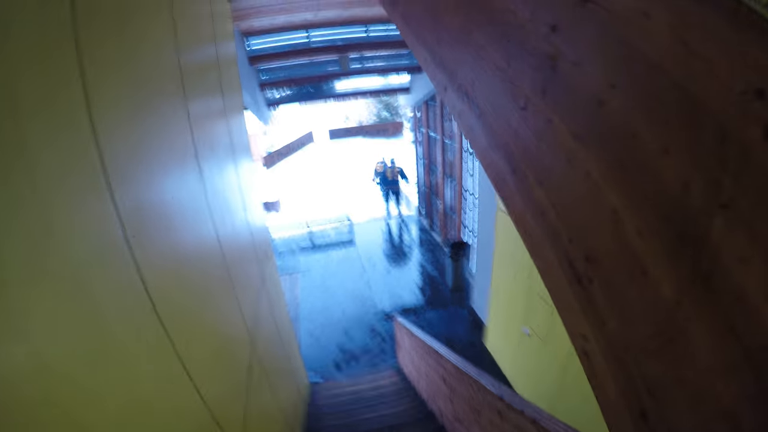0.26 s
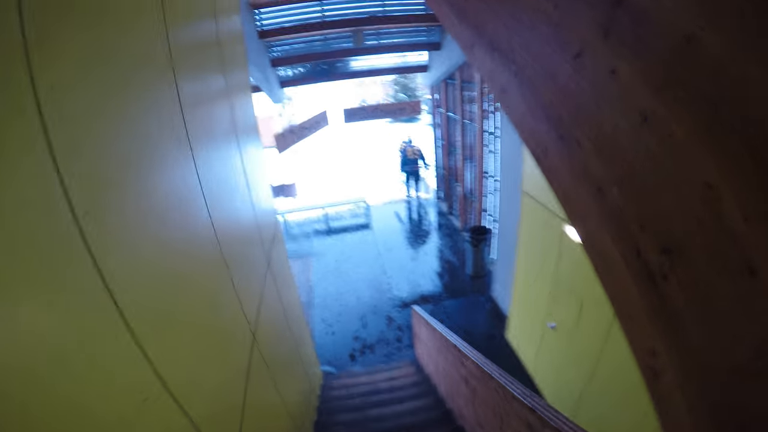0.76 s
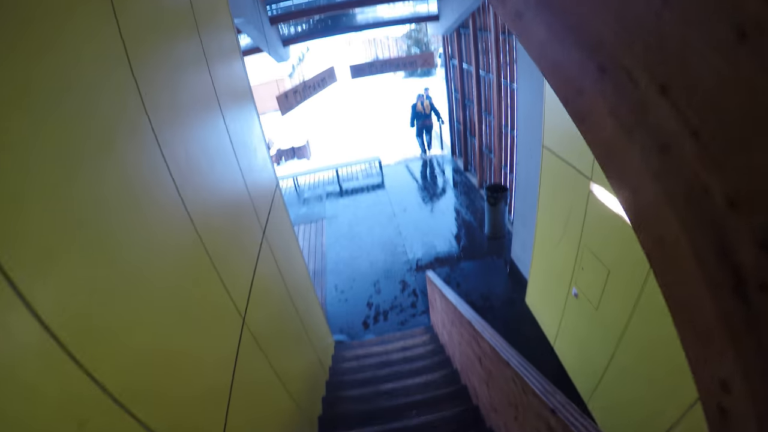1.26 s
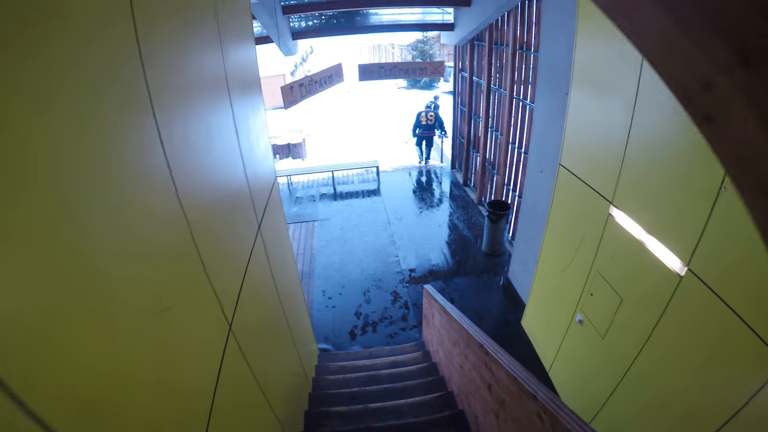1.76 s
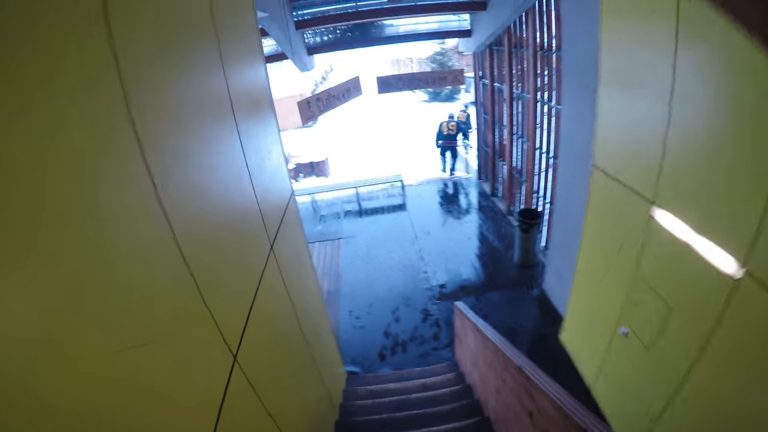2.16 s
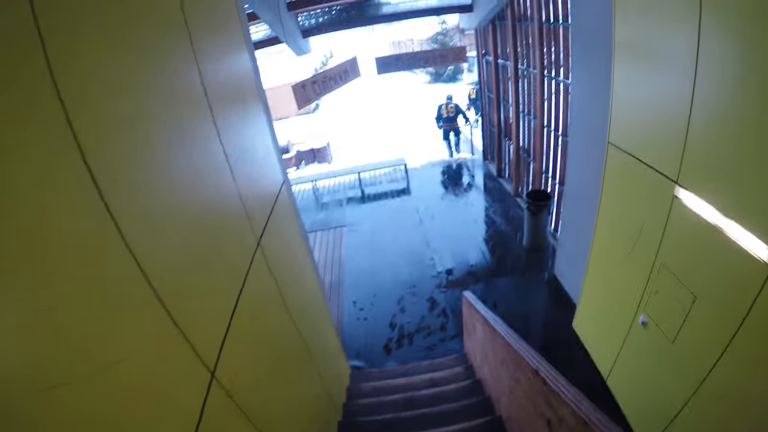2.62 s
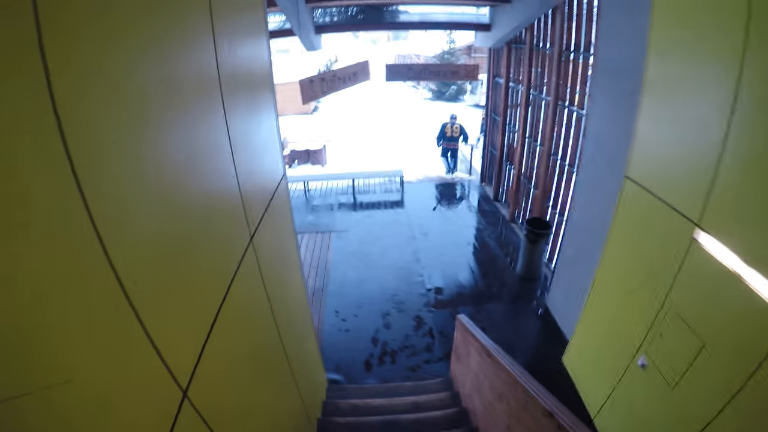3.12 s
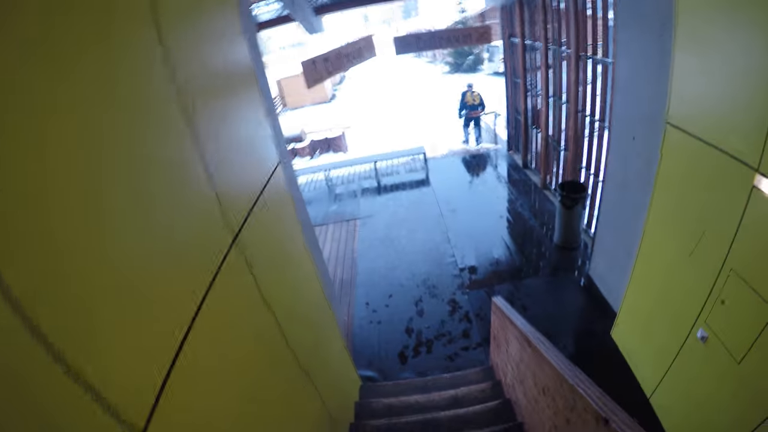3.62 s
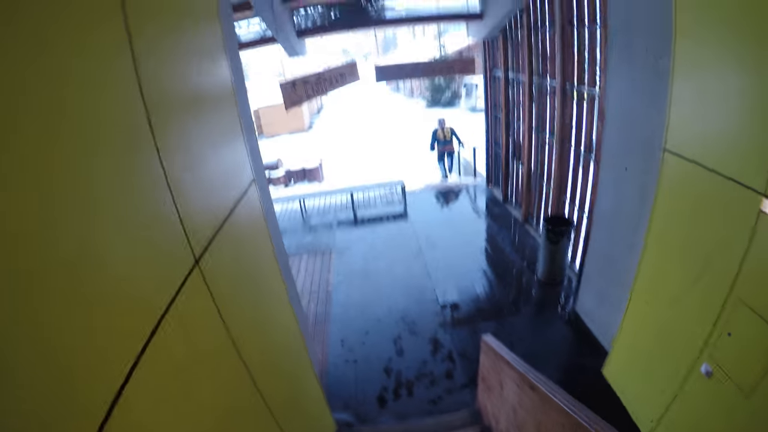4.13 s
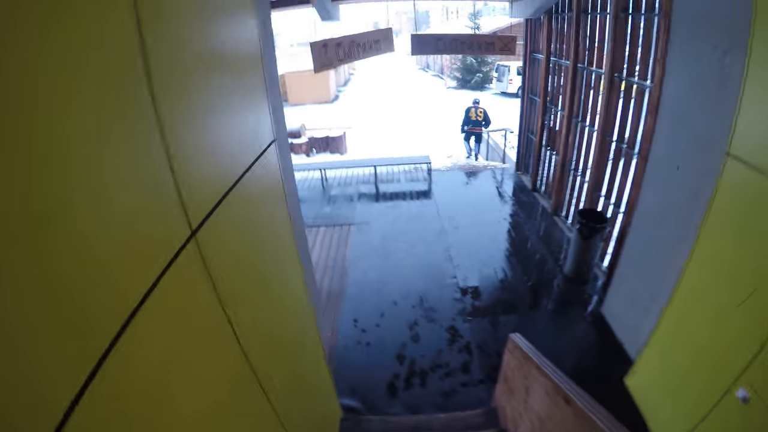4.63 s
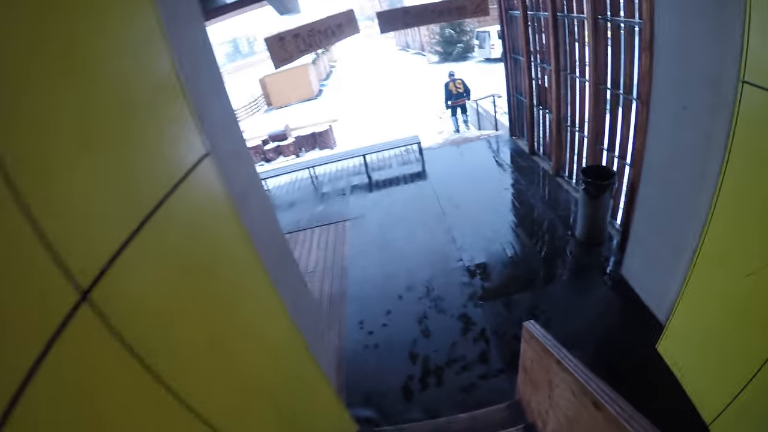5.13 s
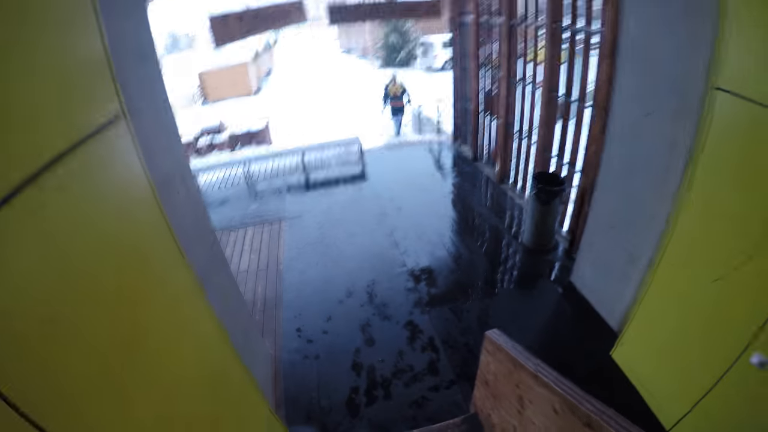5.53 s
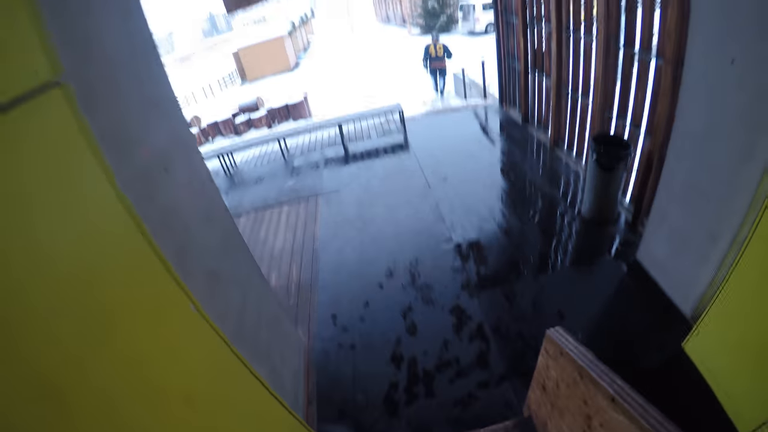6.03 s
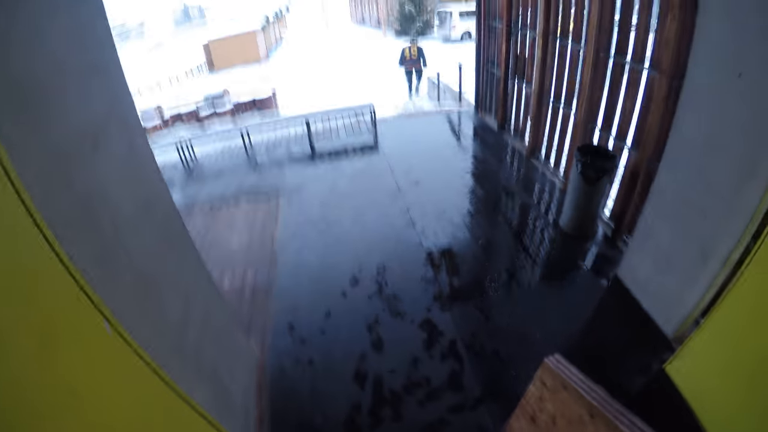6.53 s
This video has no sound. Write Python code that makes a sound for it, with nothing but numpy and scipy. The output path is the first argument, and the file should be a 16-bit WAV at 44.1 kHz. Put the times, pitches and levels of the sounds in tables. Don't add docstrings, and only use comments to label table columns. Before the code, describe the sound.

Steady, heavy bootsteps go down stairs inside a small reverberant stairwell. Each begins with a woody, hard heel knock and closes with a thinner slap, brief creak and crunch, while the flight booms deep below. Quiet cloth and boot rubbing fills the leg swings, with scattered soft hollow thuds. The close body-worn stereo microphone catches strong bass, dull treble and a short echo.

```python
import sys
import numpy as np
from scipy import signal
from scipy.fft import rfft, irfft, next_fast_len
from scipy.io import wavfile
from scipy.ndimage import uniform_filter1d

SR = 44100
rng = np.random.default_rng(int(sys.argv[2]) if len(sys.argv) > 2 else 0)


def unload_wav(signal):
    wavfile.write(
        sys.argv[1],
        SR,
        np.round(np.clip(np.atleast_2d(signal).T, -1, 1) * 32767).astype(np.int16),
    )


def attenuation_scalar(level_db):
    decades = np.asarray(level_db, float) / 20
    return 10 ** decades


N = 298677

# frequency in Hz, density in dB per Hz.
AIR = [(18, -27), (30, -10), (48, -2), (86, -49), (148, -10.5), (945, -22.5), (1190, -17), (6360, -36.5),
       (9850, -22), (12400, -44), (14100, -99)]
AIR_DB = -44.5

# shudder frequency in Hz, decay in dB/s.
FLIGHT = [(23.5, 70), (23, 110), (23, 90), (18.5, 90), (21.5, 70), (25, 110), (23.5, 120), (20, 90),
          (22.5, 90), (21, 110), (21, 120)]
# frequency in Hz, density in dB per Hz.
SWAY = [(8, -2), (14, 19.5), (24, 11.5), (34, 9.5), (48, -7), (70, -40)]
BOOM = [(35, 3), (55, 16), (85, -8), (140, 9), (190, -6), (260, -30.5)]
# rise in dB/s, fall in dB/s, rounding in s.
SHUDDER_SHAPE = (187, 100, 0.013)
SWAY_SHAPE = (47, 110, 0.044)
BOOM_SHAPE = (160, 128, 0.022)
SHUDDER_LAG_S, SWAY_LAG_S, BOOM_LAG_S = 0.0017, 0.11, -0.001
SHUDDER_DB, REST_SWAY_DB, REST_BOOM_DB = -6, -33, -40
SWING_BOOM_DB = -16.5

# time in seconds, swish, scrape, creak and boom in dB.
LANDINGS = [(0.262, -34, -26, -21, -19), (0.837, -37, -30, -22, -19), (1.612, -37, -31, -21, -21),
            (2.204, -34, -29.5, -21, -17.5), (2.847, -39.5, -28.5, -22.5, -20),
            (3.492, -34.5, -28.5, -21.5, -18), (4.157, -38.5, -27, -22, -20.5),
            (4.799, -34.5, -28, -22, -19), (5.444, -40.5, -27.5, -22, -18),
            (5.977, -36.5, -30.5, -22.5, -19.5), (6.526, -43, -32.5, -22, -17.5)]
# time in seconds, swish, rub and sway in dB.
SWINGS = [(0.05, -40, -34.5, -16.5), (0.6, -41, -36, -19), (0.97, -54, -45, -41), (1.2, -48.5, -39, -23),
          (1.93, -43.5, -39.5, -21.5), (2.4, -58, -32.5, -37), (2.55, -45, -36, -18),
          (2.9, -45, -43, -22.5), (3.18, -44, -37, -20.5), (3.865, -46.5, -38, -22), (4.5, -48.5, -43, -28),
          (5.15, -45, -36, -21.5), (5.79, -46.5, -44, -31), (6.28, -48, -42, -22), (6.66, -47, -40.5, -28)]

# frequency in Hz, density in dB per Hz.
SWISH = [(1500, -21), (2200, -8), (3000, -2.5), (4500, -2.5), (6300, -0.5), (8000, 0), (10000, -10),
         (12500, -19), (14500, -40)]
SCRAPE = [(800, -19), (1050, -0.5), (1550, -3), (2000, -6.5), (2500, -14), (3600, -14), (5000, -22.5)]
CREAK = [(200, -3.5), (300, 0), (430, -9), (520, -8), (760, 1.5), (950, -13.5), (1200, -54)]
RUB = [(160, -9), (250, 0), (330, -3), (420, -4), (560, -8.5), (800, -10), (1100, -24.5)]
# rise in dB/s, fall in dB/s, rounding in s.
SWISH_SHAPE = (130, 105, 0.05)
SCRAPE_SHAPE = (180, 122, 0.024)
CREAK_SHAPE = (370, 123.3, 0.015)
SWING_SHAPE = (102, 57, 0.0083)
SWISH_LAG_S, SCRAPE_LAG_S, CREAK_LAG_S = 0.01, -0.022, -0.046
REST_SWISH_DB, REST_SCRAPE_DB, REST_RUB_DB = -55, -55.5, -47
SWING_SCRAPE_DB = 1

# start in seconds, peak in dB, ring in Hz, second ring in Hz,
# second ring in dB re first.
THUDS = [(0.736, -20, 150, 300, -14), (2.254, -18.5, 145, 278, -18.5), (2.97, -23, 100, 202, -12),
         (6.641, -23.5, 139, 277, -16.5), (1.137, -30, 151, 333.5, -23), (1.287, -29, 148.3, 310, -27),
         (2.029, -28.5, 136, 440, -19), (2.388, -23, 145, 290.7, -4.5), (2.508, -27, 112.3, 245, -15),
         (2.939, -17, 134.2, 301, -21.5), (3.113, -25.5, 161, 408, -2), (3.287, -27.5, 112, 229, -7),
         (4.617, -21.5, 151, 323, -27), (5.064, -16, 147, 289, -13.5), (5.1, -18, 129, 261, 1),
         (5.223, -25, 139, 258, -11), (5.552, -18.5, 144, 273, -12), (5.824, -46, 145, 281, -18)]
# frequency in Hz, t60 in s.
WELL = [(100, 0.41), (400, 0.28), (900, 0.4), (2000, 0.32), (6000, 0.3)]

# start in seconds, peak in dB, first knock in Hz, tread ring in Hz,
# bright part in dB re peak.
HEELS = [(0.181, -5, 651, 365, -11), (0.767, -9, 737, 555, -7.5), (1.531, -4.5, 761, 520, -20.5),
         (2.12, -6, 739, 655, -13.5), (2.762, -6, 807, 506, -16.5), (3.405, -8.5, 717, 662, -11),
         (4.076, -11, 737, 506, -12), (4.717, -8.5, 764, 630, -7.5), (5.359, -8.5, 856, 470, -14),
         (5.894, -7.5, 713, 619, -23), (6.441, -8, 807, 460, -17.5)]
# start in seconds, peak in dB, main ring in Hz, low part in dB re peak.
SOLES = [(0.063, -26, 1140, -1), (0.226, -12, 1320, -6), (0.2808, -13.5, 1320, -17),
         (0.802, -11, 1680, -13), (0.826, -16, 1290, -15), (0.979, -24.5, 1250, -7), (1.105, -49, 1158, -5),
         (1.309, -35, 1241, -12), (1.5743, -19.5, 1760, -11), (2.2493, -19, 1730, -18),
         (2.6698, -31, 1655, -17), (2.8135, -10.5, 1480, -3), (2.8832, -25, 1670, -15),
         (3.455, -7, 1130, -3), (3.496, -14.5, 1820, 8), (4.1198, -7, 1530, -5), (4.1693, -13, 1630, -14),
         (4.5088, -28, 1320, -4), (4.7609, -9.5, 1420, -2), (4.801, -22, 1160, -1),
         (5.1233, -42, 2056, -10), (5.3954, -15.5, 1600, 15.5), (5.7742, -26.5, 1560, 1.5),
         (5.9379, -15, 1510, 2), (6.3773, -29, 1454, 3), (6.4882, -14.5, 1660, -1),
         (6.5225, -12, 1500, -12)]
# start in seconds, peak in dB.
TICKS = [(0.185, -30), (0.5766, -36), (0.7667, -36), (1.9026, -39), (2.1236, -26), (3.4082, -25),
         (4.0771, -35), (4.7207, -31), (5.1223, -41), (5.896, -40), (6.4408, -41)]
# factor on the knock frequency, level in dB, t60 in s.
KNOCK = [(0.999, 2.5, 0.028), (1.08, 6, 0.028), (0.802, 2.5, 0.037)]
# factor on the ring frequency, level in dB, t60 in s.
TREAD = [(0.631, -6.5, 0.088), (1.009, 8, 0.033)]
# frequency in Hz, level in dB, t60 in s.
BRIGHT = [(1500, 3.5, 0.0064), (1878, -12.5, 0.029), (2920, -8, 0.0078), (3700, -13.5, 0.0071),
          (6430, -17, 0.0077), (10330, -17, 0.003)]
TICK = [(4760, -6, .006), (6900, -3, .005), (12700, 4, .003)]
TICK_DB = 8

# frequency in Hz, likeness 0-1, left lead in radians.
PORTS = [(40, .98, 0), (150, .97, 0), (300, .8, 0), (520, .45, .1), (860, .5, 2.2), (1300, .58, 2.7),
         (2500, .42, .1), (4500, .35, .1), (6500, .35, -3.1), (9000, .25, -3.1), (12000, .3, -1.8)]
# frequency in Hz, left minus right in dB, colour in dB.
COLOUR = [(40, -1.3, -2), (150, -0.8, -1.5), (300, -0.3, 2.5), (587, 0, 1), (1185, -2.5, 3),
          (2470, -1, -1.5), (4800, -2, -2.5), (6320, -2, 0.5), (8670, -5, -8.5), (11860, -4.5, -18.5),
          (14200, 0, -25.5)]


def evened(x):
    return x / np.sqrt(np.mean(x ** 2) + 1e-20)


def read(points, hz, axis=1):
    rows = np.array(points, float)
    return np.interp(np.log(hz + 1), np.log(rows[:, 0] + 1), rows[:, axis])


def add(mix, s, sound):
    part = mix[round(s * SR):][:len(sound)]
    part += sound[:len(part)]


def ring(modes, rise_s, scatter=0.074):
    t = np.arange(int(SR * max(m[2] for m in modes))) / SR
    x = np.zeros(len(t))
    for hz, db, t60 in modes:
        pitch = hz * (1 + scatter * rng.uniform(-1.23, 1))
        x += attenuation_scalar(db - 60 * t / t60) * np.sin(2 * np.pi * pitch * t)
    x = x * (1 - np.exp(-t / rise_s))
    return x / abs(x).max()


def rustle(spectrum, patchy_db, flicker_db, size=512):
    hop = size // 4
    frames, hz = N // hop + 5, np.fft.rfftfreq(size, 1 / SR)
    a, b, c, d, patches = rng.standard_normal((frames, len(hz), 5)).T
    patches = uniform_filter1d(patches, 6, 0)
    patches = evened(uniform_filter1d(patches, 4000 // size + 1, 1))
    flicker = evened(uniform_filter1d(rng.standard_normal(frames), 3))
    db = read(spectrum, hz)[:, None] + patchy_db * patches + flicker_db * flicker
    z = np.array([a + 1j * b, c + 1j * d]) * attenuation_scalar(db)
    return evened(signal.istft(z, nperseg=size, noverlap=size - hop)[1][:, :N])


def swell(times, peaks_db, shape, falls=None):
    rise, fall, round_s = shape
    late = np.arange(0, N / SR + .01, .001)[:, None] - times
    fall = fall if falls is None else falls
    rounded = np.hypot(late, round_s) - round_s
    db = peaks_db - (rise + fall) / 2 * rounded + (rise - fall) / 2 * late
    power = attenuation_scalar(2 * (db - db.max(0) + peaks_db)).sum(1)
    return np.interp(np.arange(N) / SR, late[:, 0] + times[0], power)


def air():
    return attenuation_scalar(AIR_DB) * rustle(AIR, 2.2, 0.22, size=1024)


def stairwell(x):
    taps = np.zeros((2, SR))
    at = np.arange(120, SR - 20, 20) + rng.integers(0, 20, (2, (SR - 121) // 20))
    np.put_along_axis(taps, at, rng.choice([-1., 1.], at.shape), 1)
    hz, t, z = signal.stft(taps, SR, nperseg=256)
    decay = attenuation_scalar(-60 * t / read(WELL, hz)[:, None])
    tail = signal.istft(z * decay, SR, nperseg=256)[1]
    return signal.fftconvolve(x[None], tail / np.linalg.norm(tail[0]), axes=1)[:, :N]


def thuds():
    out, t60 = np.zeros(N), 0.14
    for s, db, hz, second_hz, second_db in THUDS:
        first = [(hz, 0, t60), (hz, -4, t60)]
        second = [(second_hz, second_db + 8.5, t60), (second_hz * 0.36, second_db + 0.5, t60)]
        add(out, s, attenuation_scalar(db - 1.0) * ring(first + second, 0.0035, scatter=0.03))
    return out


def stairs():
    at, *_, boom_db = np.transpose(LANDINGS)
    swing_at, *_, sway_db = np.transpose(SWINGS)
    hz, dies = np.transpose(FLIGHT)
    t = np.arange(N) / SR
    step = np.maximum(np.searchsorted([h[0] for h in HEELS], t) - 1, 0)
    landing = swell(at + SHUDDER_LAG_S, SHUDDER_DB, SHUDDER_SHAPE, dies)
    shudder = np.sqrt(2.03 * landing) * np.cos(2 * np.pi * hz[step] * (t - at[step]))
    idle = swell(swing_at + SWAY_LAG_S, sway_db, SWAY_SHAPE)
    loose = np.sqrt(idle + attenuation_scalar(2 * REST_SWAY_DB)) * rustle(SWAY, 1.0, 0.2, size=8192)[0]
    power = swell(at + BOOM_LAG_S, boom_db, BOOM_SHAPE)
    power = power + idle * attenuation_scalar(2 * SWING_BOOM_DB) + attenuation_scalar(2 * REST_BOOM_DB)
    boom = np.sqrt(power) * rustle(BOOM, 2.7, 3.9, size=2048)
    return shudder + loose + boom


def grit(per_s, spread_db, low_hz, high_hz, t60):
    size = attenuation_scalar(spread_db * np.minimum(rng.exponential(1, (2, N)), 4))
    size = size * (rng.random((2, N)) < per_s / SR)
    kind, out = rng.integers(0, 5, (2, N)), 0
    for k, hz in enumerate(np.geomspace(low_hz, high_hz, 5)):
        grain = ring([(hz, 0, t60)], 0.0011)
        out = out + signal.oaconvolve(size * (kind == k), grain[None], axes=1)[:, :N]
    return evened(out)


def lifted():
    t, gain = np.arange(N) / SR, np.ones(N)
    for s, *_ in HEELS:
        gain *= 1 - .85 * np.clip(1 + (t - s) / .03, 0, 1) ** .5 * (t < s)
    return gain


def cloth():
    at, swish_db, scrape_db, creak_db, _ = np.transpose(LANDINGS)
    swing_at, brush_db, rub_db, _ = np.transpose(SWINGS)
    brush = swell(swing_at, brush_db, SWING_SHAPE)

    hiss = swell(at + SWISH_LAG_S, swish_db, SWISH_SHAPE) + brush + attenuation_scalar(2 * REST_SWISH_DB)
    swish = np.sqrt(hiss) * rustle(SWISH, 2.3, 0.34, size=256)

    drag = swell(at + SCRAPE_LAG_S, scrape_db, SCRAPE_SHAPE)
    drag = drag + brush * attenuation_scalar(2 * SWING_SCRAPE_DB) + attenuation_scalar(2 * REST_SCRAPE_DB)
    crunch = 0.55 * grit(400, 3.7, 1160, 2477, 0.011)
    scrape = np.sqrt(drag) * (1.08 * rustle(SCRAPE, 1.0, 1.44, size=256) + crunch)

    load = swell(at + CREAK_LAG_S, creak_db, CREAK_SHAPE)
    seams = 0.56 * grit(250, 3.0, 492, 917, 0.014)
    creak = np.sqrt(load) * (0.94 * rustle(CREAK, 0.91, 0.66, size=512) + seams)

    rubbing = swell(swing_at, rub_db, SWING_SHAPE) + attenuation_scalar(2 * REST_RUB_DB)
    rub = np.sqrt(rubbing) * rustle(RUB, 1.8, 2.0, size=1024)
    return lifted() * (swish + scrape + creak + rub)


def boots():
    out = np.zeros(N)
    thump = [(57.4, 2.5, 0.15), (74.7, 3, 0.092), (97, 9.0, 0.076), (145, -6.0, 0.16)]  # Hz, dB, t60 s
    for s, db, knock_hz, ring_hz, bright_db in HEELS:
        knock = [(knock_hz * k, d, t60) for k, d, t60 in KNOCK]
        tread = [(ring_hz * k, d, t60) for k, d, t60 in TREAD]
        add(out, s, attenuation_scalar(db - 1.5) * ring(knock, 0.0022))
        add(out, s, attenuation_scalar(db - 7.5) * ring(tread, 0.0038, scatter=0.018))
        add(out, s, attenuation_scalar(db + bright_db + 5.5) * ring(BRIGHT, 0.0017))
        add(out, s, attenuation_scalar(-12) * ring(thump, 0.05))
    for s, db in TICKS:
        add(out, s, attenuation_scalar(db + TICK_DB) * ring(TICK, 0.0003))
    for s, db, hz, low_db in SOLES:
        slap = [(hz, 0, .02), (hz * 1.147, -3, .015)] + BRIGHT[2:]
        add(out, s, attenuation_scalar(db + 0.5) * ring(slap, 0.00011))
        add(out, s, attenuation_scalar(db + low_db - 13.5) * ring([(586, 0, 0.017), (831, 0, 0.053)], 0.0021))
    return out


def scene():
    near, far = boots(), thuds()
    echoes = stairwell(near + attenuation_scalar(0.5) * far)
    direct = (near + far) * attenuation_scalar([[0], [-4]])
    return direct + echoes + stairs() + cloth() + air()


def roll_off(x):
    return signal.sosfilt(signal.butter(12, 14270, fs=SR, output="sos"), x)


def record(dry):
    size = next_fast_len(N)
    hz, (a, b) = np.fft.rfftfreq(size, 1 / SR), rfft(dry, size)
    like = read(PORTS, hz, axis=1)
    shared = like * np.exp(-1j * read(PORTS, hz, axis=2)) * a
    right = shared + np.sqrt(1 - like ** 2) * b
    lean = attenuation_scalar(read(COLOUR, hz, axis=1) / 2)
    ports = np.array([a * lean, right / lean]) * attenuation_scalar(read(COLOUR, hz, axis=2))
    x = irfft(ports, size)[:, :N]
    return roll_off(1.048 * np.tanh(x / 1.22))


dry = scene()
out = record(dry)
unload_wav(out)
```